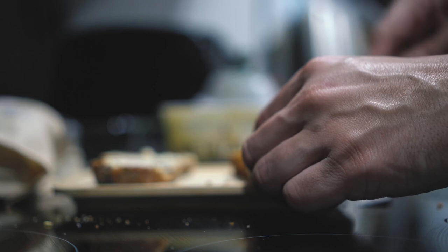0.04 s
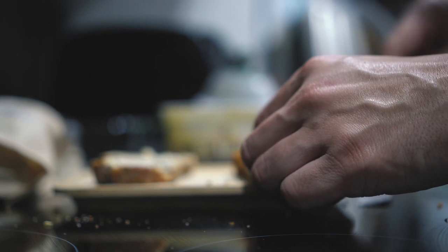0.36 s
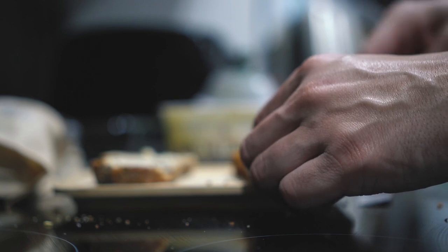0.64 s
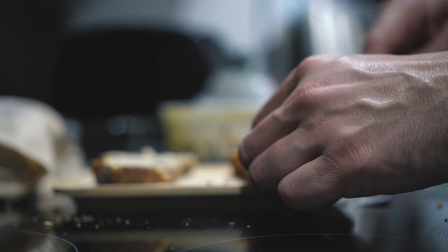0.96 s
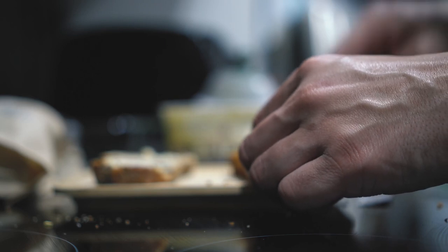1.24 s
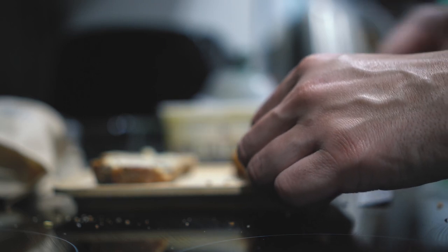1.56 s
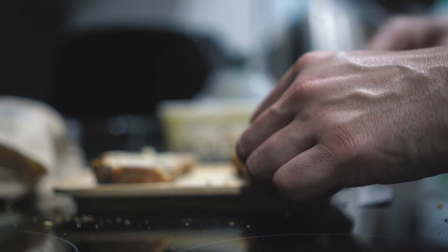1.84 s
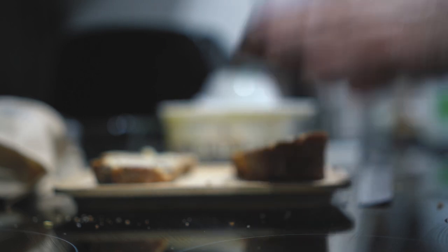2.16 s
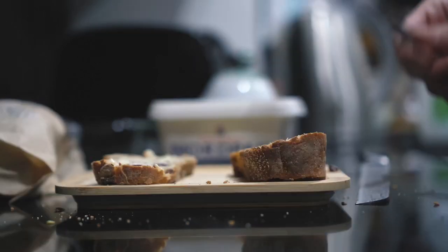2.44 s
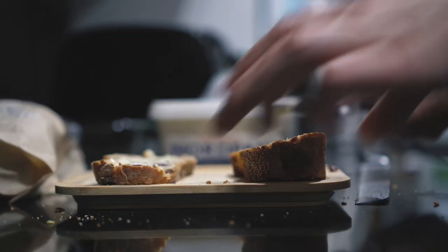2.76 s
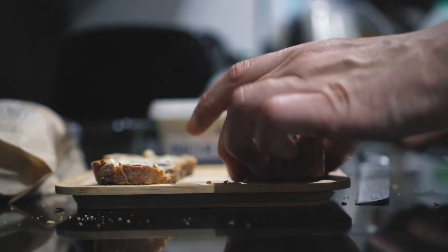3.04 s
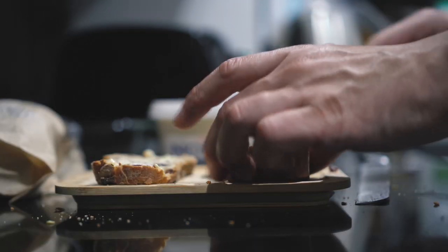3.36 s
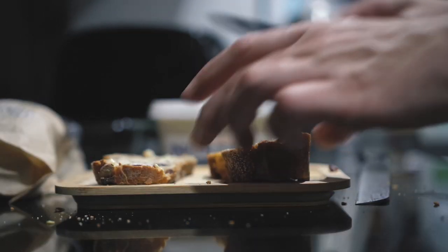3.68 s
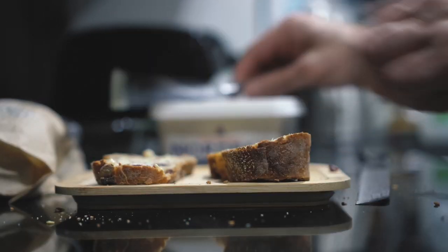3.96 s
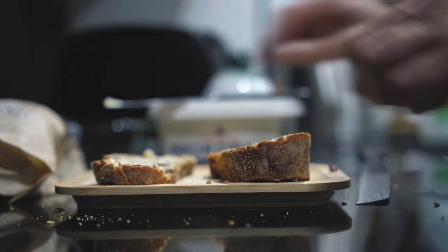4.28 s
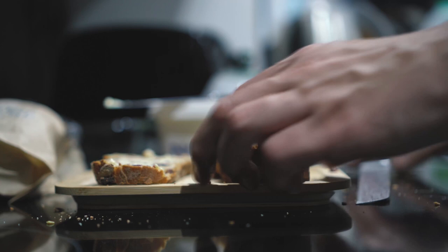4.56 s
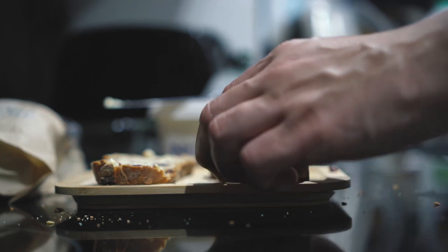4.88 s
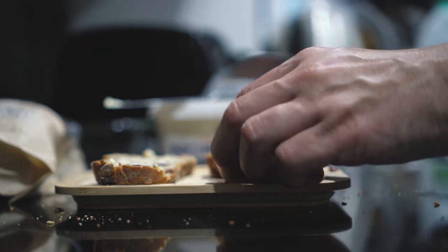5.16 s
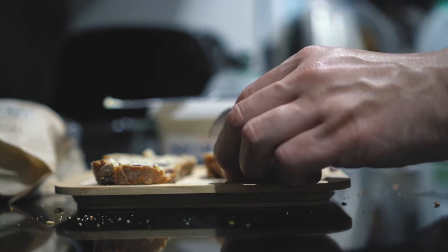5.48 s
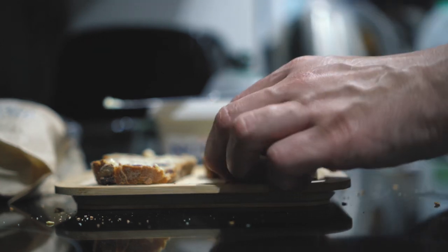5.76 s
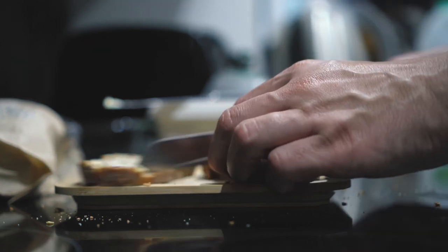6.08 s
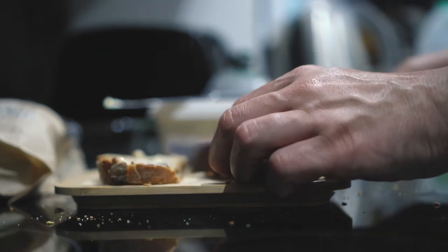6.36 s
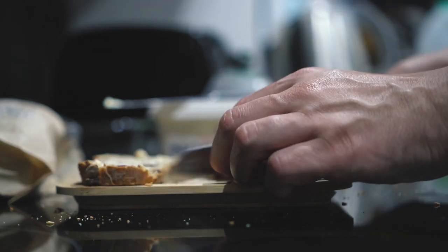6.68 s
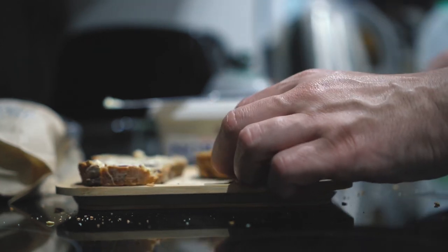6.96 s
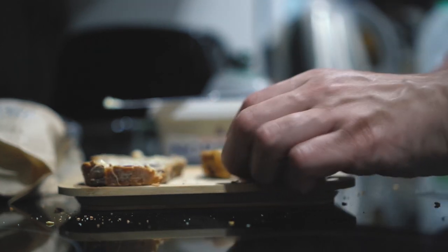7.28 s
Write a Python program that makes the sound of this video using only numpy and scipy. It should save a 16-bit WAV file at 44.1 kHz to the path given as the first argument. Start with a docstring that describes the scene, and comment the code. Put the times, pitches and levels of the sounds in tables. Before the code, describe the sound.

A knife clatters onto a plastic tub, then another saws through crusty bread, knocking on a wooden board in a quiet kitchen.

```python
"""Cutting bread in a quiet kitchen

A wooden board close to the microphone, a little to the left, with a faint appliance behind it.
A knife scrapes on bread, clacks on the counter and is dropped on a plastic tub. A second knife is
picked up with a clink, scores the crust and saws through it: the teeth tear tiny fractures and shake
the board more as the cut deepens, until the blade knocks through onto the wood."""
import sys
import numpy as np
from scipy import signal
from scipy.fft import rfft, irfft
from scipy.io import wavfile
from scipy.ndimage import uniform_filter1d

SR = 44100
rng = np.random.default_rng(int(sys.argv[2]) if len(sys.argv) > 2 else 0)


def persist_wave(psi):
    """Save psi, clipped to +-1, as 16-bit WAV."""
    counts = np.round(np.clip(psi, -1, 1) * 32767).astype(np.int16)
    wavfile.write(sys.argv[1], SR, np.atleast_2d(counts).T)


N = 332073
TIME = np.arange(N) / SR
RING_TIME = TIME[:SR * 3 // 4]  # seconds since a blow

# Modes of the wooden board. Each row: frequency in Hz, level in dB.
BOARD_MODES = [(170, -8), (262, -9.5), (345, -10.5), (400, 2.5), (478, 1), (522, 1.5), (554, 4.5), (632, 0),
               (882, -4.5), (1280, -24), (1460, -10.5), (1645, -19), (1800, -3), (2960, -3)]
# The thud, clack and tick bands of a contact. Each row: lower and upper edge in Hz.
BANDS_HZ = [(110, 900), (900, 3000), (3000, 16000)]


def amp(db):
    """Decibels to gain."""
    return 10 ** (np.asarray(db) / 20)


def unit(x):
    """Scale to rms 1."""
    return x / np.sqrt(np.mean(x ** 2))


def fade(t60):
    """Exponential decay, 60 dB down after t60 seconds."""
    return np.exp(-np.log(1000) * RING_TIME / t60)


def swell(centre_s, half_s):
    """A bell-shaped rise and fall."""
    return np.exp(-((TIME - centre_s) / half_s) ** 2 / 2)


def wander(rate):
    """Smooth random drift with rms 1."""
    size = max(int(SR / rate), 1)
    return unit(uniform_filter1d(uniform_filter1d(rng.standard_normal(N), size), size))


def band(x, low_hz, high_hz, order=3):
    """Causal band-pass."""
    sos = signal.butter(order, [low_hz, min(high_hz, SR / 2 - 1)], "band", fs=SR, output="sos")
    return signal.sosfilt(sos, x + 1e-18)


def convolve(x, response):
    """Convolve, keeping the length."""
    return signal.fftconvolve(np.atleast_2d(x), np.atleast_2d(response), axes=-1)[:, :np.shape(x)[-1]]


def colour(x, points, size=2048):
    """Minimum-phase filter through (Hz, dB) points."""
    hz, db = np.transpose(points)
    bins_hz = np.arange(size // 2 + 1) * SR / size
    gain = amp(np.interp(np.log(bins_hz + 1), np.log(hz), db))
    cepstrum = irfft(np.log(gain))[:size // 2]
    cepstrum[1:] *= 2
    return convolve(x, irfft(np.exp(rfft(cepstrum, size))))


def scattered(count):
    """Stereo noise from all around the microphone: alike in the bass, less so in the treble."""
    # Stereo width. Each row: frequency in Hz, side against mid in dB.
    width = [(150, -21), (420, -21), (700, -15), (1400, -8), (3000, -4), (6000, -3), (14000, -4)]
    mid, side = rng.standard_normal((2, count))
    return mid + colour(side, width) * np.array([[1], [-1]])


def add(out, start_s, sound):
    """Mix a sound in at its start time."""
    start = max(int(start_s * SR), 0)
    out[:, start:start + sound.shape[-1]] += sound[..., :N - start]


def damped(modes, t60):
    """Give (Hz, dB) modes their decay: t60 seconds at 400 Hz, shorter above."""
    return [(hz, db, t60 * (400 / hz) ** 0.4) for hz, db in modes]


def ring(modes, polarity=-1, wave=np.sin):
    """Sum (Hz, dB, t60) modes; neighbours start opposed (polarity -1) or all together (1)."""
    return sum(polarity ** k * amp(db) * wave(2 * np.pi * hz * RING_TIME) * fade(t60)
               for k, (hz, db, t60) in enumerate(modes))


def grains(rate, spread_db):
    """Tiny random impacts, about rate a second; spread_db makes their strengths uneven."""
    occurs = rng.random(N) < rate / SR
    size = np.minimum(rng.exponential(size=N), 5)
    direction = rng.choice([-1, 1], N)
    return unit(occurs * direction * amp(spread_db * size))


def kitchen(direct, wet_db):
    """Direct sound plus reflections from counter and walls, wet_db against it."""
    tail = scattered(len(RING_TIME)) * fade(t60=0.22)
    reflections = convolve(direct, tail / np.sqrt(np.sum(tail ** 2) / 2))
    return (direct + amp(wet_db) * reflections) / np.hypot(1, amp(wet_db))


def struck(blows, tone, overtones, tone_db, snap_db, crack_t60, tail_db, tail_t60):
    """Each blow gives a contact snap, rings the modes and leaves dense overtones in the room."""
    out = np.zeros((2, N))
    envelope = amp(snap_db) * fade(0.00012) + fade(crack_t60) + amp(tail_db) * fade(tail_t60)
    for start, *levels_db in blows:
        crack = colour(scattered(len(RING_TIME)) * envelope, overtones)
        sound = unit(crack) + amp(tone_db) * unit(tone)
        for edges_hz, db in zip(BANDS_HZ, levels_db):  # the hardness of the blow sets three bands
            part = band(sound, *edges_hz)
            onset_rms = np.sqrt(np.mean(part[:, :SR // 100] ** 2))
            add(out, start, part * amp(db) / onset_rms)
    return out


def room_tone():
    """Steady hiss of the kitchen with the faint whirr and wavering whine of an appliance."""
    # Spectrum of the hiss. Each row: frequency in Hz, relative level in dB.
    hiss_colour = [(30, -23), (55, -19), (110, -21), (250, -12), (400, -5), (600, 0), (1000, -1),
                   (2000, -2.5), (4000, -6), (8000, -10.5), (16000, -14)]
    # Bands of the whirr. Each row: centre in Hz, width in Hz, level in dB.
    whirr_bands = [(580, 70, -74), (1500, 90, -71.5), (2410, 120, -69.5), (2860, 90, -75), (3950, 70, -80)]
    # Narrow tones of the whine. Each row: frequency in Hz, level in dB.
    whine_tones = [(400, -82), (689, -81), (1319, -81), (1464, -78.5), (1535, -79.5), (2385, -77),
                   (2471, -78), (2665, -79)]

    def noise_band(hz, width_hz, order):
        return unit(band(scattered(N), hz - width_hz / 2, hz + width_hz / 2, order))

    hiss = amp(-61.8) * unit(colour(scattered(N), hiss_colour))
    whirr = sum(amp(db) * noise_band(hz, width_hz, order=1) for hz, width_hz, db in whirr_bands)
    whine = sum(amp(db) * noise_band(hz, width_hz=11, order=2) for hz, db in whine_tones)
    return hiss + whirr + whine


def rubs():
    """Blade or fingers rub on bread and counter: a dull drag in the board and fine grit on top."""
    # Each row: centre and half length in seconds, drag and grit in dB.
    touches = [(0, 0.012, -48, -57), (0.362, 0.076, -68, -56.5), (0.605, 0.085, -62, -55),
               (0.89, 0.11, -63, -58), (1.316, 0.017, -63, -61), (1.474, 0.034, -56, -53.5),
               (1.788, 0.054, -65, -56.5), (3.302, 0.014, -50.5, -68), (4.51, 0.017, -47.5, -46.5),
               (4.61, 0.031, -53, -45), (4.704, 0.018, -48, -48)]
    drag, grit = np.zeros((2, N))
    for centre, half, drag_db, grit_db in touches:
        touch = swell(centre, half)
        drag += amp(drag_db) * touch
        grit += amp(grit_db) * touch
    wood = convolve(grains(rate=600, spread_db=4), ring(damped(BOARD_MODES, t60=0.07)))
    dull = unit(band(wood, 250, 2000, order=2))
    grit_colour = [(150, -14), (600, 5.5), (1900, -1.5), (4500, -6), (8000, -17.5), (15000, -26)]
    fine = unit(colour(grains(rate=1200, spread_db=4.5), grit_colour))
    return kitchen(drag * dull + grit * fine, wet_db=3.5)


def scratches():
    """Dry crust scratches on steel or skin in short, crisp bursts of tiny fractures."""
    # Each row: centre and half length in seconds, level in dB.
    bursts = [(.348, .018, -56), (.65, .02, -56.5), (1.461, .008, -44), (1.79, .012, -54),
              (2.078, .012, -51.5), (2.974, .016, -52), (3.185, .025, -59), (4.632, .014, -51)]
    # Spectrum of the crackle. Each row: frequency in Hz, relative level in dB.
    crackle_colour = [(400, -11.5), (1200, -4.5), (2000, 9), (4500, 2.5), (6500, -4), (9000, -1),
                      (16000, -17)]
    envelope = sum(amp(db) * swell(centre, half) for centre, half, db in bursts)
    crackle = unit(colour(grains(rate=3000, spread_db=4), crackle_colour))
    return kitchen(envelope * crackle, wet_db=-1)


def edge_clicks():
    """A steel edge meets something hard: bright clicks, over in a few milliseconds."""
    # Each row: start in seconds, peak in dB.
    contacts = [(2.084, -55), (3.566, -41), (4.096, -9), (4.1312, -46.5), (6.291, -43), (7.23, -28)]
    # Spectrum of a click. Each row: frequency in Hz, relative level in dB.
    click_colour = [(500, -13), (2000, 11), (5000, -5), (8000, 7), (11500, -3), (16000, 1)]
    out = np.zeros((2, N))
    for start, peak_db in contacts:
        click = colour(scattered(len(RING_TIME)) * fade(t60=0.009), click_colour)
        add(out, start, amp(peak_db) * click / np.abs(click).max())
    return out


def counter_clack():
    """The first knife clacks on the hard counter; the ring breaks off abruptly."""
    # Each row: start in seconds, then thud, clack and tick in dB.
    blows = [(2.302, -32.5, -24, -27.5)]
    # Modes of the counter and its dense overtones. Each row: frequency in Hz, relative level in dB.
    modes = [(168, -1.5), (275, -1.5), (415, 9), (612, 9), (668, -4), (1080, -8), (1340, 3.5), (1600, 3),
             (2450, -21)]
    overtones = [(65, -81), (110, -10), (536, 2), (620, 6.5), (1020, -14), (1310, -4), (1460, -10.5),
                 (1990, -13.5), (3960, -15), (4880, -12.5), (16000, -28.5)]
    silent_at_s, break_s = 2.378, 0.0013
    clack = struck(blows, ring(damped(modes, t60=0.18)), overtones,
                   tone_db=-4, snap_db=-20, crack_t60=0.038, tail_db=-12.5, tail_t60=0.45)
    return clack * np.clip((silent_at_s - TIME) / break_s, 0, 1)


def tub_drop():
    """The butter knife touches the plastic tub twice while a hand damps it, then lands and bounces."""
    # Light touches, then the landing. Each row: start in seconds, then thud, clack and tick in dB.
    touches = [(3.916, -37, -34.5, -47.5), (3.958, -38.5, -46, -51)]
    bounces = [(4.0075, -22, -21, -23.5), (4.0115, -26, -27.5, -41), (4.0175, -44, -27, -25),
               (4.097, -28.5, -33.5, -52), (4.1005, -34.5, -24, -24), (4.114, -22.5, -24.5, -30),
               (4.132, -26, -31, -28)]
    # The knife's weight passes through the tub into the counter. Each row: start in seconds, level in dB.
    thumps = [(4.011, -40), (4.102, -44), (4.127, -43)]
    # Modes of the free tub and its dense overtones. Each row: frequency in Hz, relative level in dB.
    free_modes = [(168, -22.5), (272, -15.5), (290, -17), (415, 5), (458, 6), (554, -1), (603, 2), (635, 7),
                  (712, 4.5), (820, -5), (1200, -16), (1500, -4.5), (1660, 4), (1950, -2), (2255, -3),
                  (2920, -38)]
    overtones = [(65, -2), (110, -19.5), (228, -18.5), (281, -3.5), (368, -8), (409, -1), (620, 5.5),
                 (780, -3.5), (2260, -9.5), (3220, -24.5), (12000, -30), (16000, -44)]
    held_modes = [(440, -19), (620, -14.5), (760, -13.5), (900, -17), (1080, -21.5), (1500, -20)]
    out = struck(touches, ring(damped(held_modes, t60=0.089)), overtones,
                 tone_db=3, snap_db=-4, crack_t60=0.03, tail_db=-9, tail_t60=0.35)
    out += struck(bounces, ring(damped(free_modes, t60=0.23)), overtones,
                  tone_db=-2, snap_db=8, crack_t60=0.055, tail_db=-16, tail_t60=0.44)
    thump = band(ring([(115, 0, 0.04)]), 80, 220, order=2)
    for start, db in thumps:
        add(out, start, amp(db) * thump)
    return out


def knife_pickup():
    """The second knife clinks as it is nudged on the counter and rings as it is lifted free."""
    # Each row: start in seconds, then thud, clack and tick in dB.
    nudges = [(4.598, -38.5, -42.5, -67), (4.668, -46, -46.5, -60), (4.754, -42, -35, -47),
              (4.772, -70, -35, -45), (4.779, -43.5, -57, -35.5)]
    # Modes and dense overtones of the resting blade. Each row: frequency in Hz, relative level in dB.
    resting_modes = [(430, -8), (580, -8), (1020, -7), (1600, 0), (1685, 3), (1760, 0), (2490, -3),
                     (2630, 0), (2900, -2), (4290, -4)]
    overtones = [(65, -22), (110, -19), (417, 6), (1340, 4), (2560, 1.5), (3350, -9), (4220, -4),
                 (6260, -13.5), (12200, -15), (16000, -26)]
    # Modes of the free blade. Each row: frequency in Hz, relative level in dB, t60 in seconds.
    free_modes = [(1690, -2, .1), (2013, 3, .19), (2401, -2, .6), (2643, -1, .19), (2810, 6, .27),
                  (3898, -6, .2), (4212, -1, .24), (4310, 1, .13), (5405, -6, .2), (5782, -3, .18),
                  (6815, -8, .17), (7424, -2, .2), (9100, -2.5, .33), (10010, -7, .24), (10150, -4, .27),
                  (11950, -3, .19), (13860, -7, .24), (14730, -8, .2)]
    out = struck(nudges, ring(damped(resting_modes, t60=0.17)), overtones,
                 tone_db=3, snap_db=0, crack_t60=0.03, tail_db=-11, tail_t60=0.27)
    add(out, start_s=4.773, sound=amp(-47) * kitchen(ring(free_modes), wet_db=-9))
    return out


def board_knocks():
    """The blade knocks on the wood, pushing all its modes at once; the hand rocks it with low bumps."""
    # Each row: start in seconds, then thud, clack and tick in dB.
    knocks = [(2.916, -48, -51.5, -59), (2.936, -48, -55, -55), (3.149, -65, -50.5, -58),
              (3.286, -47, -57, -60), (6.271, -46, -52, -56), (6.553, -32, -34.5, -48.5),
              (6.624, -34.5, -42, -48), (6.806, -34, -43, -62), (6.822, -27, -40.5, -62),
              (6.838, -28, -37.5, -64), (7.026, -51, -40, -43.5), (7.199, -41.5, -46.5, -62),
              (7.229, -43, -50, -56), (7.248, -34.5, -45, -56), (7.325, -18.5, -27.5, -46.5),
              (7.365, -36, -62, -68)]
    # Dense overtones of the wood. Each row: frequency in Hz, relative level in dB.
    overtones = [(47, -74), (80, -34.5), (422, 15), (550, -6), (1070, 1.5), (1740, 5.5), (2380, -11),
                 (4830, 0), (6450, -10), (14600, -14), (16000, -83)]
    # The holding hand presses on the board. Each row: start in seconds, gain in dB.
    presses = [(0.554, -77), (0.813, -72.5), (1.294, -77), (1.746, -78), (2.915, -67), (3.284, -72),
               (5.322, -80)]
    wood = ring(damped(BOARD_MODES, t60=0.14), polarity=1, wave=np.cos)
    out = struck(knocks, wood, overtones,
                 tone_db=-1, snap_db=-13, crack_t60=0.028, tail_db=-15, tail_t60=0.32)
    soft_onset = 1 - fade(0.0077)
    bump = ring([(95, 7.5, 0.21), (154, -0.5, 0.75), (177.5, 6.5, 0.61)]) * soft_onset
    for start, db in presses:
        add(out, start, amp(db) * bump)
    return out


def crust_snaps():
    """The largest flakes of crust snap one by one under the blade, all equally brittle."""
    # Each row: start in seconds, clack in dB.
    snaps = [(.343, -54), (.589, -53.5), (.640, -57), (.877, -55), (1.450, -54), (1.463, -49),
             (5.871, -48.5), (5.917, -47.5), (5.964, -52), (5.999, -50.5), (6.028, -43.5), (6.049, -49),
             (6.291, -44), (6.435, -44), (6.459, -47), (7.285, -41.5)]
    # Modes of a flake and its dense overtones. Each row: frequency in Hz, relative level in dB.
    modes = [(400, 10), (980, -16), (1550, -23), (1880, -2.5)]
    overtones = [(65, -30), (110, -24), (392, -34), (595, 9), (902, -22.5), (1870, -7), (2260, -56),
                 (5890, 0.5), (16000, -7)]
    thud_db, tick_db = -15, -17.5  # against the clack
    blows = [(start, db + thud_db, db, db + tick_db) for start, db in snaps]
    return struck(blows, ring(damped(modes, t60=0.031)), overtones,
                  tone_db=-4, snap_db=-2, crack_t60=0.025, tail_db=-8, tail_t60=0.14)


def whistle_and_squeaks():
    """A faint high whistle sounds before the cutting; later the blade groans and squeals in the bread."""
    # The whistle first, then the blade's stick-slip tones.
    # Each row: centre and half length in seconds, pitch in Hz, level in dB.
    tones = [(3.44, 0.06, 4759, -71), (6.084, 0.028, 610, -51.5), (6.184, 0.032, 255, -54),
             (6.222, 0.048, 4312, -53), (6.99, 0.01, 397.4, -38.5), (7.038, 0.015, 400, -37),
             (7.207, 0.0067, 412, -32.5), (7.25, 0.017, 402, -37)]
    drift_hz, flutter_db = 14 * wander(rate=184), 2 * wander(rate=150)
    out = np.zeros(N)
    for centre, half, hz, db in tones:
        phase = 2 * np.pi * np.cumsum(hz + drift_hz) / SR
        out += amp(db + flutter_db) * swell(centre, half) * np.sqrt(2) * np.sin(phase)
    return kitchen(out, wet_db=-10)


def stroke(start, length, release_db_per_s, attack_s=0.083):
    """One pass of the blade: up to speed by its start, steady for its length, then slowing to its turn."""
    attack = np.clip(1 + (TIME - start) / attack_s, 0, 1) ** 2
    return attack * amp(-release_db_per_s * np.maximum(TIME - start - length, 0))


def sawing():
    """Teeth catch and slip, shaking the board, and tear the crust into a stream of tiny fractures."""
    # Each row: start and length in seconds, then crust rasp, tooth hiss, board shake and rise of
    # the push over the stroke, all in dB.
    strokes = [(5.903, 0.17, -50.5, -60.5, -66, 25), (6.093, 0.044, -46.5, -50.5, -54.5, 15.5),
               (6.312, 0.11, -43.5, -50, -50.5, 8), (6.585, 0.042, -43, -49.5, -37.5, -3),
               (6.745, 0.068, -44.5, -49, -37.5, 10.5), (7.006, 0.038, -43.5, -49, -42, 2.5),
               (7.203, 0.037, -46, -47.5, -43.5, 3), (7.348, 0.066, -52.5, -60, -45.5, -0.5)]
    # Spectrum of the tearing crust. Each row: frequency in Hz, relative level in dB.
    rasp_colour = [(29, -55), (50, 13), (125, -46), (167, -10.5), (306, -11.5), (380, -18.5), (646, -10),
                   (729, -16.5), (1430, -21.5), (2620, -24), (2880, -26.5), (3500, -24), (12600, -35.5),
                   (16000, -42)]
    # Modes of the blade gripped by the bread. Each row: frequency in Hz, level in dB, t60 in seconds.
    gripped_modes = [(2080, -3, .02), (2940, 2, .045), (3700, -4, .02), (4220, -4, .02), (4760, -1, .035)]
    _, clack_band, tick_band = BANDS_HZ
    shake, rasp, hiss = np.zeros((3, N))
    for start, length, rasp_db, hiss_db, shake_db, rise_db in strokes:
        speed = stroke(start, length, release_db_per_s=173)
        rasp += amp(rasp_db) * speed
        hiss += amp(hiss_db) * speed
        push_db = rise_db * (np.clip((TIME - start) / length, 0, 1) - 0.5)
        shake += amp(shake_db + push_db) * stroke(start, length, release_db_per_s=212)

    slips = grains(rate=820, spread_db=0.5)
    board_ring = unit(convolve(slips, ring(damped(BOARD_MODES, t60=0.077))))
    roughness = unit(colour(grains(rate=1100, spread_db=-1.5), rasp_colour))
    wood = board_ring + amp(-1.5) * roughness
    # the force that tears the crust also rumbles through the counter
    rumble = amp(-15) * rasp * unit(band(slips, 72, 203))
    body = shake * unit(band(wood, 140, 590)) + rumble
    steel = amp(-5) * hiss * unit(convolve(slips, ring(gripped_modes)))

    # countless crumbs blur into a soft rasp, from which the larger fractures stand out
    fractures = colour(grains(rate=1700, spread_db=4) + amp(-9) * unit(scattered(N)), rasp_colour)
    crunch = unit(band(fractures, *clack_band)) + unit(band(wood, *clack_band))
    tearing = rasp * unit(crunch) + hiss * unit(band(fractures, *tick_band))
    uneven_bite = unit(amp(2.4 * wander(rate=170)))
    return kitchen(body + steel, wet_db=-0.5) + kitchen(uneven_bite * tearing, wet_db=-1)


def scene():
    """The work goes on a little to the left of the microphone, with the room tone all around."""
    # Each row: frequency in Hz, left minus right in dB.
    lean = [(300, .3), (700, 1.8), (1400, .8), (3000, 2.4), (8000, 3)]
    handling = counter_clack() + tub_drop() + knife_pickup()
    cutting = board_knocks() + crust_snaps() + sawing()
    left, right = handling + cutting + whistle_and_squeaks() + rubs() + scratches() + edge_clicks()
    left = colour(left, [(hz, db / 2) for hz, db in lean])
    right = colour(right, [(hz, -db / 2) for hz, db in lean])
    return np.vstack([left, right]) + room_tone()


def record(dry):
    """The recorder cuts the top treble steeply."""
    top_hz = 15900
    return signal.sosfilt(signal.ellip(10, 0.2, 70, top_hz, fs=SR, output="sos"), dry)


dry = scene()
out = record(dry)
persist_wave(out)
```